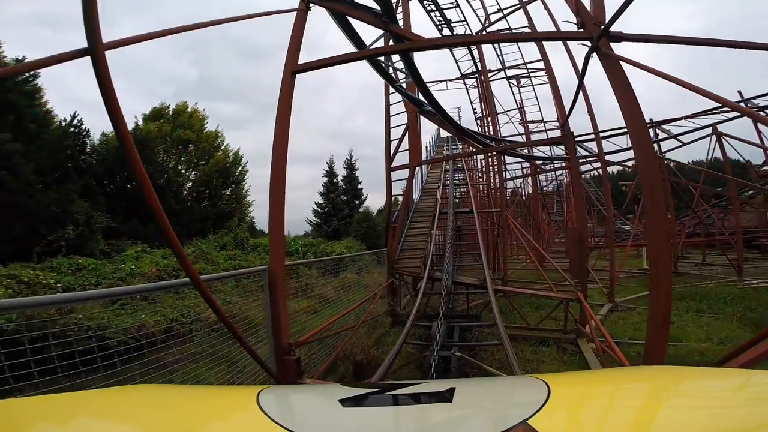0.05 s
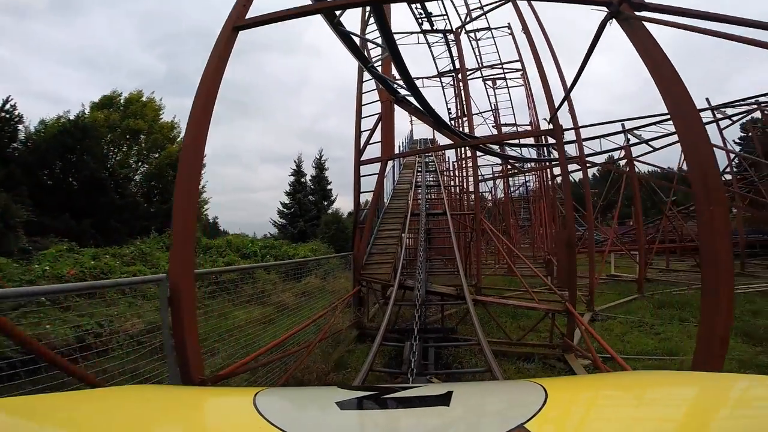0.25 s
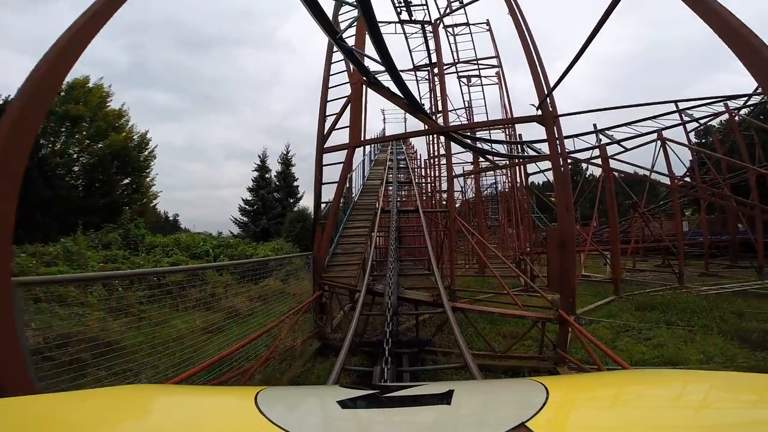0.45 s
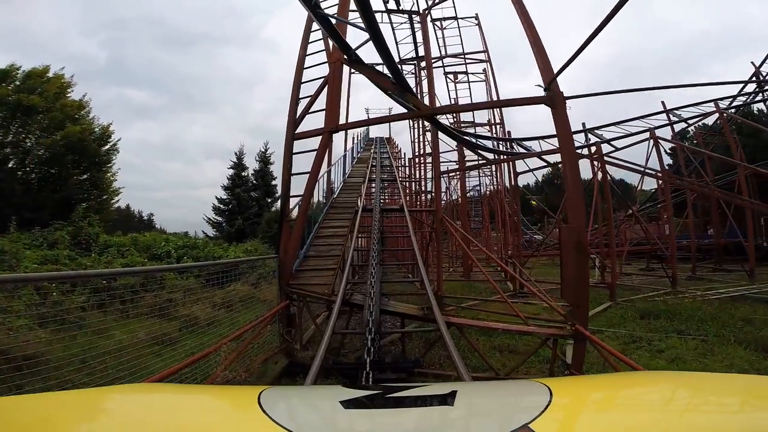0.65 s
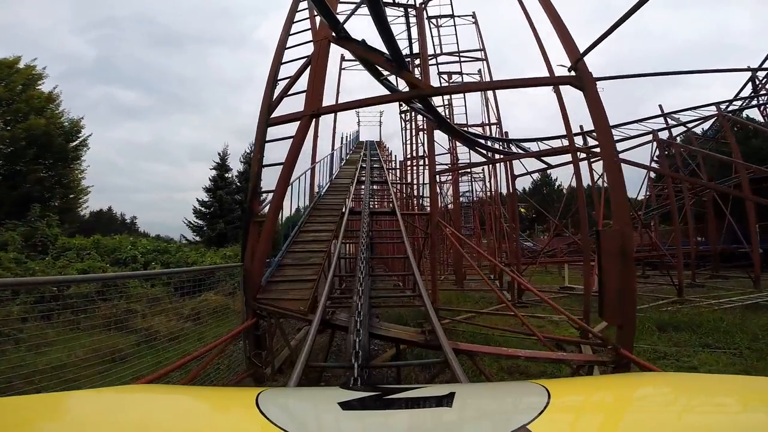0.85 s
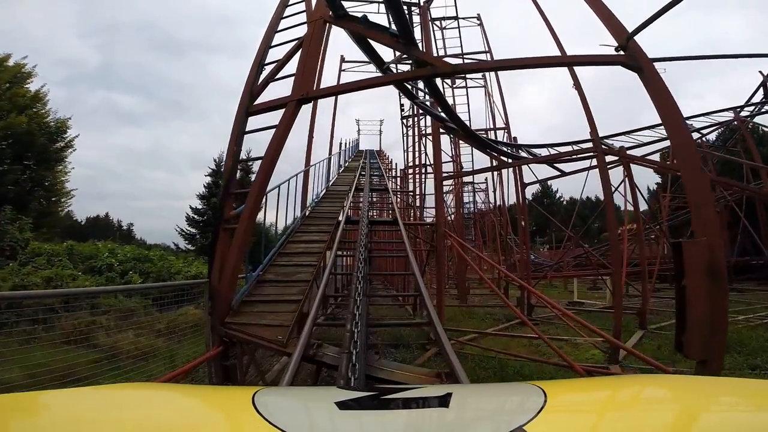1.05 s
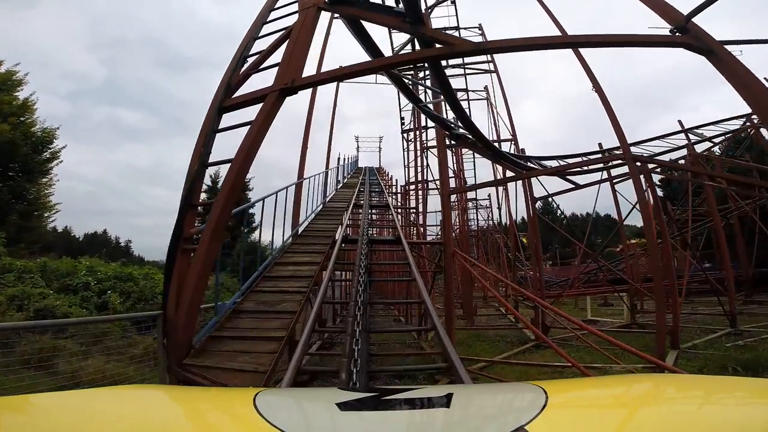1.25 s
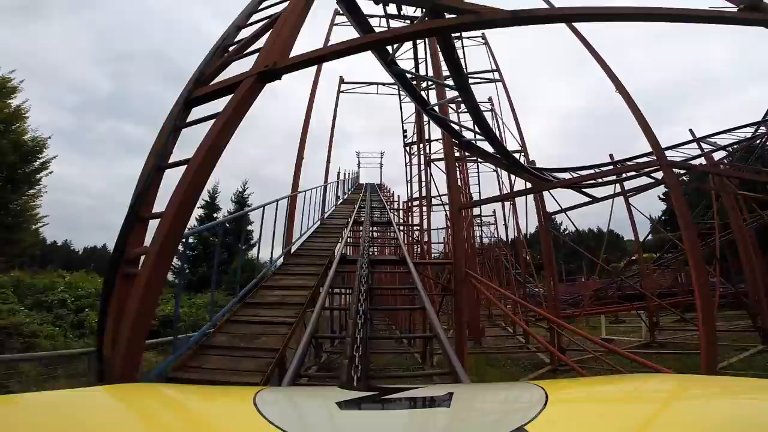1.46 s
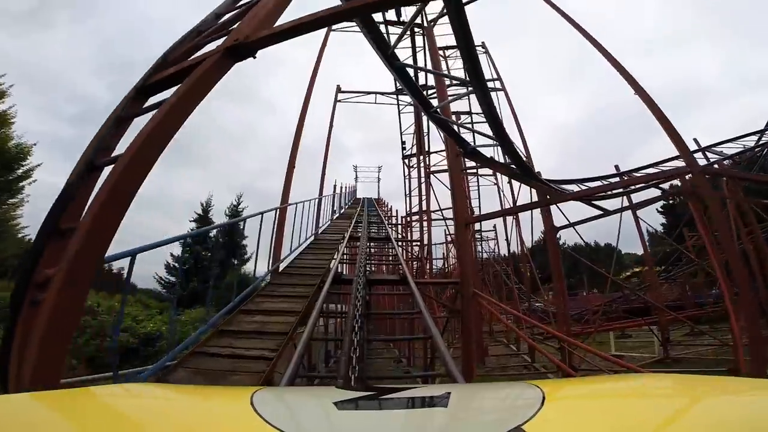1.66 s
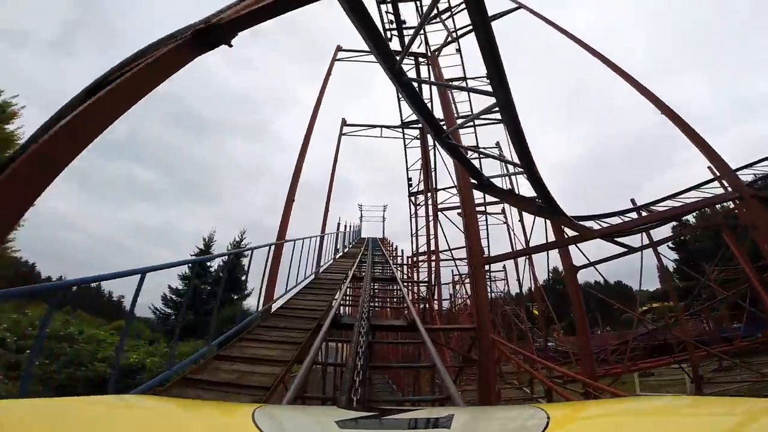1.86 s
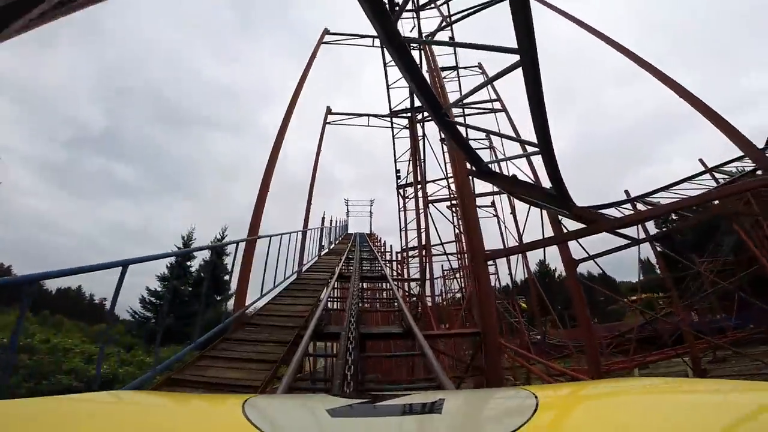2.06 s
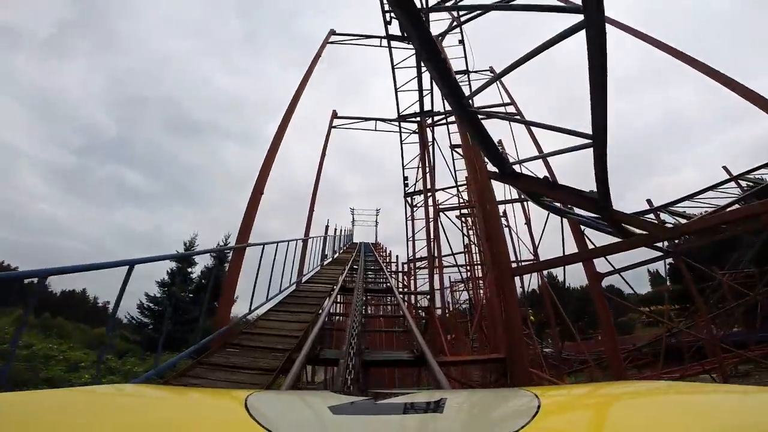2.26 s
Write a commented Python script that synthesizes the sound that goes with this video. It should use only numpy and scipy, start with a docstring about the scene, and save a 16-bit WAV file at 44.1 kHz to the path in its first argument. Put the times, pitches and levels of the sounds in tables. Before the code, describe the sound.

A roller coaster car rolls along steel track, heard from its nose, with a deep boom and wheel rumble that swell toward 1 second. Rail joints thump, loose fittings tick and knock, and the lift chain clacks faintly and steadily. Steel clashes around 1.4 to 1.5 seconds. At about 1.9 seconds the car catches the chain with sharp clanks and a scrape, then chatters from 2.2 seconds as the rumble fades.

```python
"""At the foot of a roller coaster's lift hill, heard from a camera on the nose of a rolling car.
The car body booms, the wheels rumble and thump over rail joints, loose fittings tick, and the
lift chain clacks steadily ahead. Steel clashes as the car runs onto the lift; its chain dog
catches with a burst of clanks, scrapes and chatters on. The contacts ring through the steel frame."""
import sys
import numpy as np
from scipy import signal
from scipy.fft import rfft, irfft, next_fast_len
from scipy.io import wavfile
from scipy.ndimage import uniform_filter1d, map_coordinates

SR = 44100
rng = np.random.default_rng(int(sys.argv[2]) if len(sys.argv) > 2 else 0)


def waveform_to_disk(signal):
    """Save audio, clipped to [-1, 1], as 16-bit WAV at the path in sys.argv[1]."""
    frames = np.transpose(np.atleast_2d(signal))
    scaled = np.clip(frames, -1, 1) * 32767
    samples = np.round(scaled).astype(np.int16)
    wavfile.write(sys.argv[1], SR, samples)


N = 105840


def amp(db):
    """Decibels to gain."""
    return 10 ** (np.asarray(db) / 20)


def unit(x):
    """Scaled to rms 1."""
    return x / np.sqrt(np.mean(x ** 2) + 1e-20)


def along(points, hz):
    """(frequency, value) points interpolated on a log axis."""
    point_hz, values = np.transpose(points)
    return np.interp(np.log(hz + 1), np.log(point_hz + 1), values)


def curve(points):
    """(time, value) points as one value per sample."""
    return np.interp(np.arange(N) / SR, *np.transpose(points))


def wobble(rate_hz):
    """Smooth random curve, rate_hz knots a second."""
    return map_coordinates(rng.standard_normal(2048), [np.arange(N) * rate_hz / SR], mode="wrap")


def resonance_db(hz, centre_hz, half_width_hz, boost_db):
    """Bell-shaped boost."""
    return boost_db / (1 + ((hz - centre_hz) / half_width_hz) ** 2)


def coloured(x, gain_db):
    """Minimum-phase filter with response gain_db(hz)."""
    half = next_fast_len(len(x))
    gain = amp(gain_db(np.fft.rfftfreq(2 * half, 1 / SR)))
    cepstrum = irfft(np.log(gain + 1e-6))
    cepstrum[1:half] *= 2
    cepstrum[half + 1:] = 0
    return irfft(rfft(x, 2 * half) * np.exp(rfft(cepstrum)))[:len(x)]


def noise(spectrum):
    """Shaped noise of rms 1."""
    gain = amp(along(spectrum, np.fft.rfftfreq(N, 1 / SR)))
    return unit(irfft(rfft(rng.standard_normal(N)) * gain, N))


def steady(x, window_samples):
    """Slow swells evened out."""
    return x / np.sqrt(np.abs(uniform_filter1d(x ** 2, window_samples)) + 1e-6)


def burst(start_s, attack_s, t60_s, hold_s=0):
    """Envelope: quick rise, hold, exponential fall."""
    t = np.maximum(np.arange(N) / SR - start_s, 0)
    return (1 - np.exp(-t / attack_s)) * amp(-60 * np.maximum(t - hold_s, 0) / t60_s)


def add(track, start_s, sound):
    """Mixes a sound into the track."""
    part = track[max(round(start_s * SR), 0):][:len(sound)]
    part += sound[:len(part)]


# response of the car's nose to a contact (frequency [Hz], gain [dB])
CONTACT_SPECTRUM = [(80, -2), (280, 4), (430, -5), (750, 1), (1400, 0), (2750, 6), (3250, -10.5),
                    (4300, -16), (5000, -25.5), (15000, -67)]


def knock(t60_s, scatter_db, treble_db=0, rings_hz=()):
    """Hard contact: a pulse scatters through the nose, coloured by the struck part's resonances."""
    def response_db(hz):
        rings = sum(resonance_db(hz, centre, 0.26 * centre, boost_db=10) for centre in rings_hz)
        shelf = treble_db * (1 - 1 / (1 + (hz / 5000) ** 4))
        return along(CONTACT_SPECTRUM, hz) + rings + shelf

    t = np.arange(SR // 10) / SR
    envelope = (1 - np.exp(-t / 0.00083)) * amp(-60 * t / t60_s)
    force = amp(scatter_db) * envelope * rng.standard_normal(len(t))
    force[0] += 1  # the pulse
    hit = coloured(force, response_db)
    return amp(-15) * hit / np.sqrt(np.sum(hit ** 2) / (SR * t60_s))


# dog catching the chain (time [s], level [dB], t60 [s], treble [dB])
DOG_CLANKS = [(1.919, -5, 0.014, -1), (1.9377, -8, 0.006, -32), (1.951, -9, 0.01, 15.5),
              (1.9955, -4, 0.0071, 26.5), (2.0187, -8.5, 0.029, -51), (2.034, -6.5, 0.063, 3.5),
              (2.043, -9, 0.012, 12), (2.081, -10, 0.012, 13), (2.084, -5, 0.0086, 5),
              (2.101, -14.5, 0.039, 2)]
# dog scraping over the chain (time [s], level [dB])
DOG_SCRAPE = [(1.86, -80), (1.91, -32.5), (2.04, -42), (2.075, -35), (2.115, -22.5), (2.14, -44.5),
              (2.19, -52.5), (2.26, -48.5), (2.4, -40)]
# dog chattering along the chain (time [s], level [dB])
DOG_CHATTER = [(2.201, -18.5), (2.203, -20), (2.2183, -22), (2.229, -23), (2.2428, -21.5), (2.258, -13),
               (2.2659, -15.5), (2.276, -27), (2.281, -20), (2.293, -15), (2.307, -20.5), (2.35, -20.5),
               (2.372, -23), (2.393, -22.5)]


def chain_dog():
    """The dog under the car slams into the chain, scrapes over it in tiny ringing slips, then chatters."""
    def slip_response_db(hz):
        return along(CONTACT_SPECTRUM, hz) + resonance_db(hz, 2560, half_width_hz=150, boost_db=5)

    clanks, chatter = np.zeros((2, N))
    for s, db, t60_s, treble_db in DOG_CLANKS:
        add(clanks, s, amp(db + 1) * knock(t60_s, scatter_db=-17, treble_db=treble_db))
    for s, db in DOG_CHATTER:
        add(chatter, s, amp(db) * knock(t60_s=0.012, scatter_db=-6.5, treble_db=15.5))
    chatter = signal.sosfilt(signal.butter(8, 8200, fs=SR, output="sos"), chatter)
    slips_per_s, spread_db = 900, 5
    slips = (rng.random(N) < slips_per_s / SR) * amp(spread_db * rng.standard_normal(N))
    scrape = amp(curve(DOG_SCRAPE)) * unit(coloured(slips - slips.mean(), slip_response_db))
    return clanks + scrape + chatter


# body boom (time [s], level [dB])
BOOM_LEVEL = [(0, -31), (.28, -25), (.37, -16), (.46, -23), (.54, -14), (.66, -24), (.75, -14), (.9, -13),
              (.98, -17), (1.04, -11), (1.23, -10), (1.48, -18), (1.62, -16), (1.72, -24), (1.9, -14),
              (1.97, -23), (2.4, -32)]
# lowest body resonance (time [s], frequency [Hz])
BOOM_FREQUENCY = [(.5, 44.72), (.7, 39.15), (1.02, 46.48), (1.42, 46.56), (1.6, 39.14)]
# wheel rumble, also driving the body's shake (time [s], level [dB])
RUMBLE_LEVEL = [(0, -32), (.25, -30), (.6, -26), (.95, -21), (1.1, -25), (1.5, -22), (1.75, -26),
                (2.03, -24), (2.22, -37), (2.4, -42)]
# body shake (frequency [Hz], gain [dB])
SHAKE_SPECTRUM = [(12, -6), (30, -3), (55, 0.5), (140, -56), (400, -120)]


def car_body():
    """The body booms unevenly at its lowest resonance and shakes irregularly around it."""
    pitch_hz = curve(BOOM_FREQUENCY) * (1 + 0.045 * wobble(rate_hz=14))
    tone = np.sqrt(2) * np.sin(2 * np.pi * np.cumsum(pitch_hz) / SR)
    lurch = unit(amp(2 * wobble(rate_hz=18)))
    boom = amp(curve(BOOM_LEVEL) + 1) * lurch * tone
    shake = amp(curve(RUMBLE_LEVEL) + 3) * steady(noise(SHAKE_SPECTRUM), window_samples=4000)
    return boom + shake


# wheel rumble (frequency [Hz], gain [dB])
RUMBLE_SPECTRUM = [(40, -25.5), (65, 6), (135, 6.5), (190, -6.5), (250, -9.5), (400, -32.5), (1500, -73.5)]
# thumps at rail joints, the last a low thud under the dog's clank (time [s], level [dB])
JOINT_THUMPS = [(0.298, -18.5), (0.744, -14), (0.889, -9), (1.233, -13), (1.411, -13.5), (1.543, -18),
                (1.883, -11), (2.013, -30)]
# rolling noise (time [s], level [dB])
ROLL_LEVEL = [(0, -55.5), (.45, -43), (.87, -39), (.91, -30.5), (1.0, -39.5), (1.2, -39.5), (1.5, -32.5),
              (1.72, -42.5), (1.92, -34), (2.1, -42.5), (2.18, -50), (2.4, -72)]
# rolling noise (frequency [Hz], gain [dB])
ROLL_SPECTRUM = [(100, -8.5), (280, 13), (480, 3), (1200, 0.5), (2700, 1), (4200, -7.5), (5000, -12.5),
                 (6200, -8.5), (8200, -33), (15000, -51)]


def wheels():
    """Wheels on steel rails: low rumble, thumps at the joints, gritty rolling noise."""
    t = np.arange(N) / SR
    shudder = steady(noise(RUMBLE_SPECTRUM), window_samples=1500)
    rumble = amp(curve(RUMBLE_LEVEL)) * shudder
    thumps, thump_hz = np.zeros(N), 84.5
    for s, db in JOINT_THUMPS:
        tone = np.sin(2 * np.pi * thump_hz * (t - s))
        thumps += amp(db) * burst(s, attack_s=0.0055, t60_s=0.21) * (tone + 1.11 * shudder)
    grit_db = 2.95 * wobble(rate_hz=130)
    roll = amp(curve(ROLL_LEVEL) - 3.5 + grit_db) * noise(ROLL_SPECTRUM)
    return rumble + thumps + roll


# steel clashing under the car (time [s], level [dB], t60 [s])
STEEL_CLASHES = [(1.41, -27, 0.19), (1.444, -21, 0.22), (1.525, -27, 0.2), (1.879, -29.5, 0.12)]
# clashing steel (frequency [Hz], gain [dB])
CLASH_SPECTRUM = [(150, 10), (1200, -1), (2700, 0), (4100, -4.5), (4900, -19.5), (6200, -9), (8300, -28),
                  (12500, -41), (15000, -58)]


def clashes():
    """Steel parts clash and grind as the car runs onto the lift."""
    envelope = sum(amp(db) * burst(s, attack_s=0.002, t60_s=t60_s) for s, db, t60_s in STEEL_CLASHES)
    grind = amp(1.7 * wobble(rate_hz=600))
    return envelope * unit(grind * noise(CLASH_SPECTRUM))


# loose fittings (time [s], level [dB])
FITTING_TICKS = [(0.1995, -20.5), (.32, -32), (.709, -29), (.737, -28.5), (.762, -28), (0.808, -30.5),
                 (.8844, -26), (.897, -28), (.907, -32), (.916, -26), (.949, -27.5), (1.019, -27),
                 (1.044, -27), (1.097, -26), (1.5949, -22.5), (1.812, -19.5)]
# hollow parts (time [s], level [dB], lower resonance [Hz], upper resonance [Hz])
HOLLOW_KNOCKS = [(0.2298, -24.5, 730, 2600), (0.368, -23, 595, 2020), (.422, -34, 860, 1840),
                 (0.6516, -17.5, 870, 2140), (.656, -19, 1320, 2370), (0.6883, -23, 550, 1550),
                 (0.8407, -19.5, 603, 1560), (1.717, -27, 457, 760)]


def fittings():
    """Loose fittings tick and jiggle faintly; hollow parts knock."""
    tick_hz, t60_s, scatter_db = 2137, 0.011, -19
    out = np.zeros(N)
    ticks = [(s, db, tick_hz) for s, db in FITTING_TICKS]
    for s, db, *rings_hz in ticks + HOLLOW_KNOCKS:
        add(out, s, amp(db + 4) * knock(t60_s, scatter_db, rings_hz=rings_hz))
    jiggles, from_s, to_s = 24, 0.47, 1.3
    for slot, (offset, strength) in enumerate(rng.random((jiggles, 2))):
        s = from_s + (to_s - from_s) * (slot + offset) / jiggles
        add(out, s, amp(-40 + 12 * strength) * knock(t60_s, scatter_db, rings_hz=[tick_hz]))
    return out


# links passing the sprocket in turn (level [dB])
LINK_CLACKS = [-49, -47.5, -46.5, -45.5, -48.5, -48, -39.5, -42, -42, -47.5, -46, -42.5, -49.5, -49.5]
# sharp chain snaps (time [s], level [dB])
SNAPS = [(1.2652, -37.5), (1.2897, -31), (1.318, -34), (1.746, -42), (1.878, -33.5)]
# running chain (frequency [Hz], gain [dB])
CHAIN_SPECTRUM = [(200, -31), (700, -8.5), (3700, 8.5), (5000, -1.5), (6300, 1), (8300, -14.5),
                  (12500, -22), (14500, -52)]


def lift_chain():
    """The running chain: steady hiss, a bright clack per link, a few sharp snaps."""
    first_s, period_s, attack_s, hiss_db = -0.015, 0.0913, 0.0006, -63
    clacks = sum(amp(db) * burst(first_s + link * period_s, attack_s, t60_s=0.1, hold_s=0.012)
                 for link, db in enumerate(LINK_CLACKS))
    snaps = sum(amp(db) * burst(s, attack_s, t60_s=0.057) for s, db in SNAPS)
    return np.hypot(clacks + snaps, amp(hiss_db)) * noise(CHAIN_SPECTRUM)


# steel frame resonances (frequency [Hz], boost [dB])
FRAME_MODES = [(700, 5), (800, 3), (1127, 2.5), (1325, 5), (1805, 3.5), (1958, 2), (2163, 1.5), (2495, 2),
               (2627, 1.5)]


def frame(x, half_width_hz=12):
    """Sound carried through the steel frame rings briefly at its resonances."""
    def modes_db(hz):
        return sum(resonance_db(hz, centre_hz, half_width_hz, db) for centre_hz, db in FRAME_MODES)

    return coloured(x, modes_db)


def scene():
    """Body and chain are heard directly, the contacts through the frame."""
    direct = car_body() + lift_chain()
    contacts = wheels() + clashes() + fittings() + chain_dog()
    return (direct + frame(contacts))[None]


# camera housing dips (frequency [Hz], width [Hz], gain [dB])
HOUSING_DIPS = [(2075, 26, -16), (3160, 40, -7), (5520, 100, -24)]


def record(dry):
    """The housing cuts narrow dips; the camera rounds the highest peaks and limits the band."""
    def dips_db(hz):
        return sum(db * np.exp(-((hz - centre) / width) ** 2) for centre, width, db in HOUSING_DIPS)

    ceiling, top_hz = 0.92, 15360
    housed = coloured(dry[0], dips_db)
    rounded = housed / (1 + np.abs(housed / ceiling) ** 8) ** (1 / 8)
    lowpass = signal.ellip(10, 0.1, 90, top_hz, fs=SR, output="sos")
    return signal.sosfilt(lowpass, rounded)[None]


dry = scene()
out = record(dry)
waveform_to_disk(out)
```